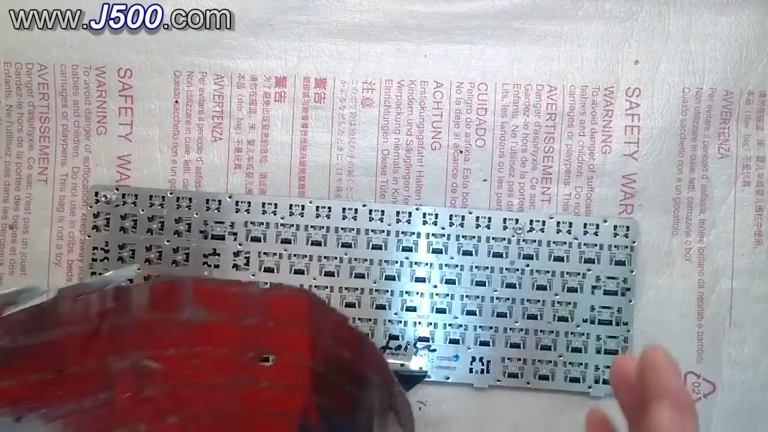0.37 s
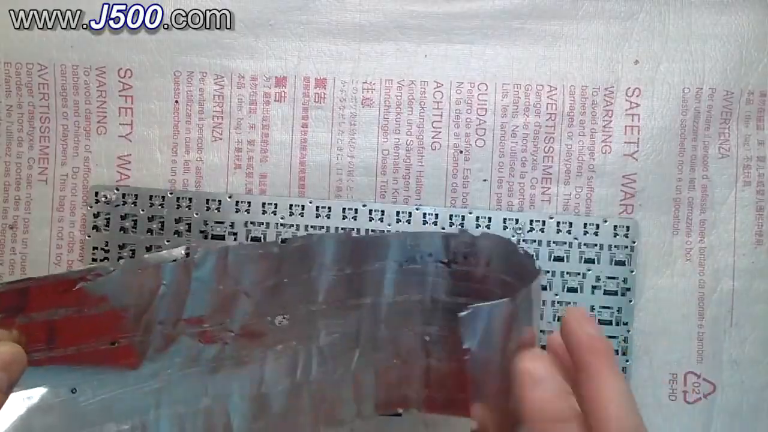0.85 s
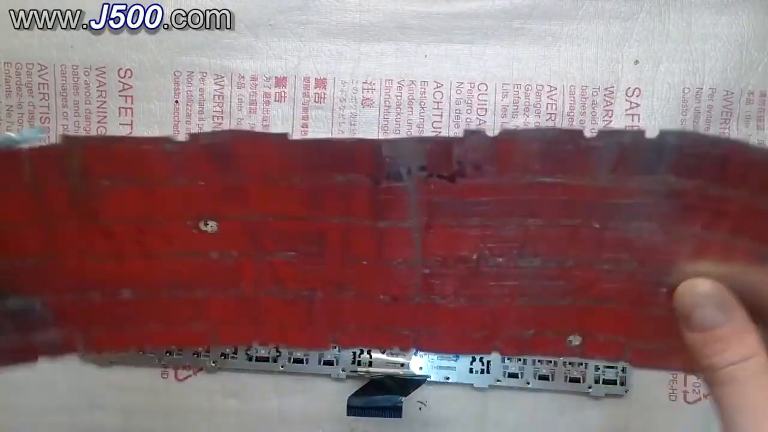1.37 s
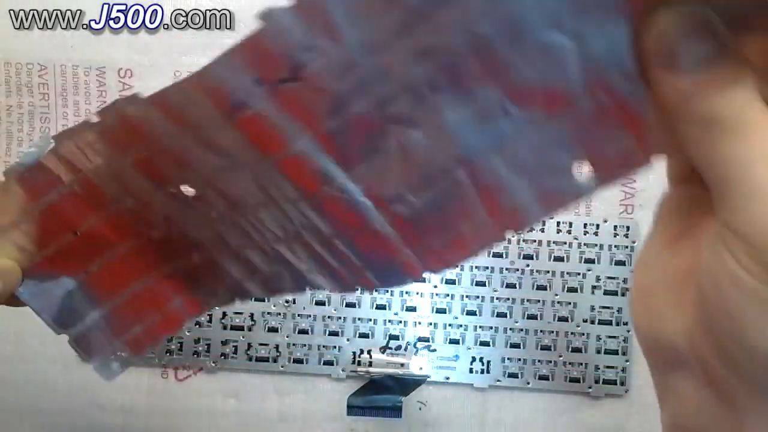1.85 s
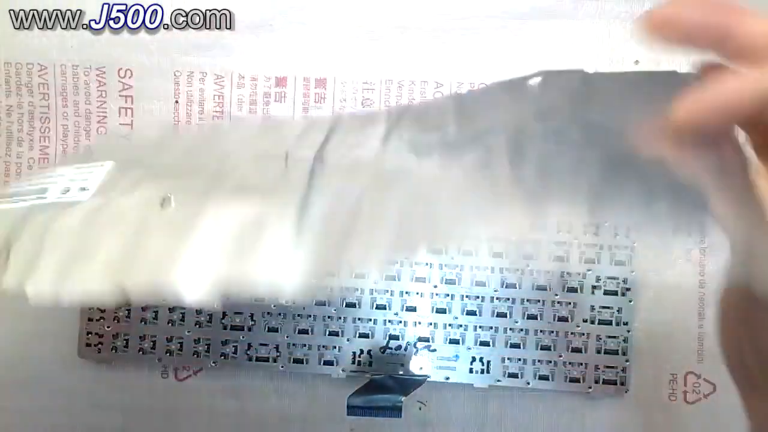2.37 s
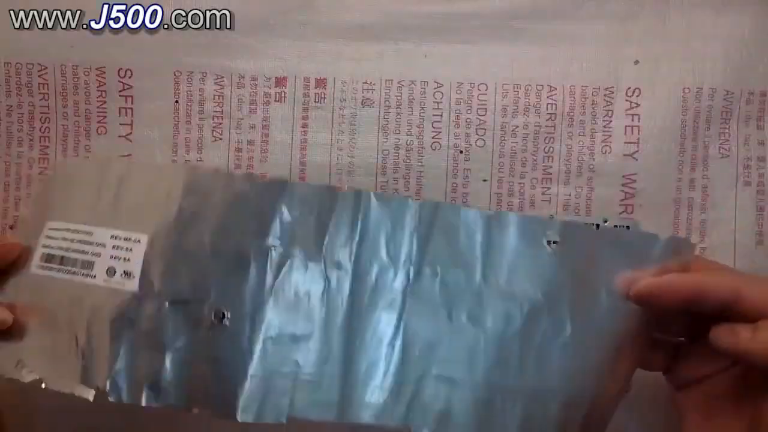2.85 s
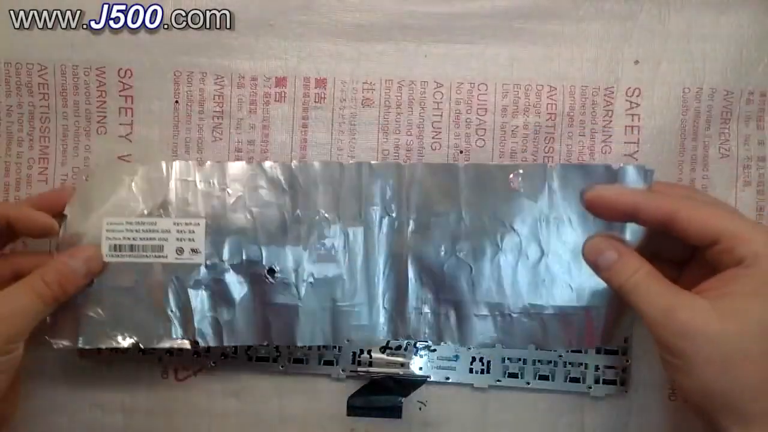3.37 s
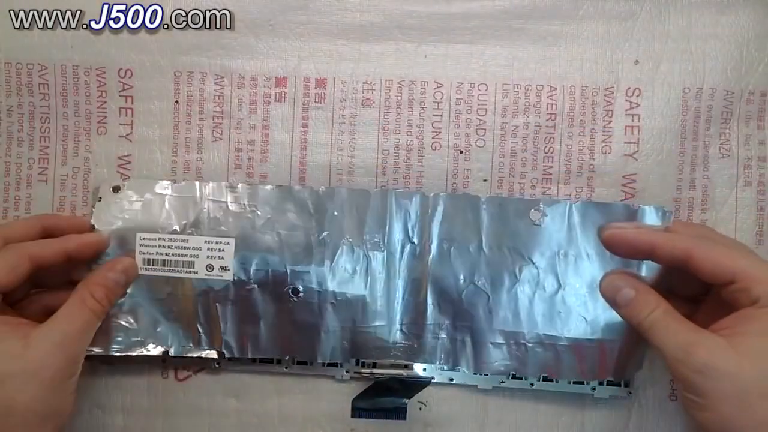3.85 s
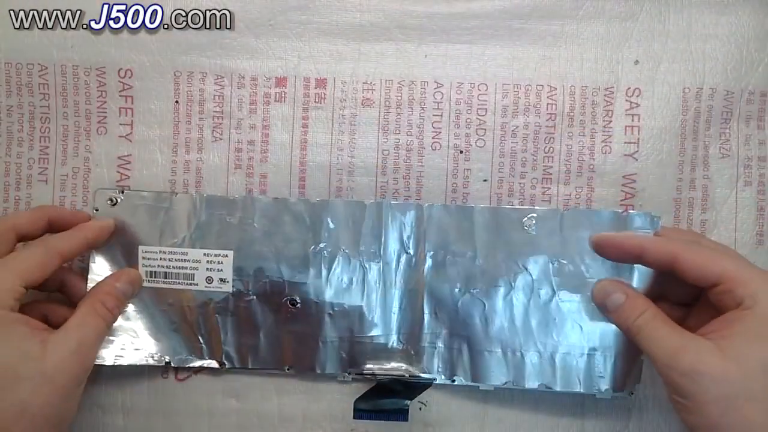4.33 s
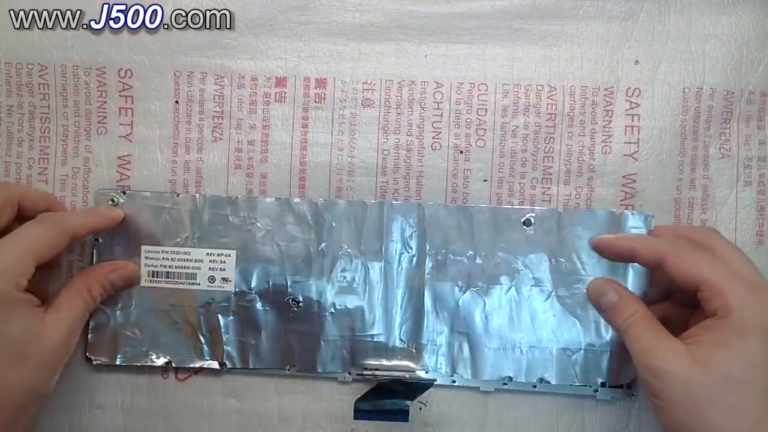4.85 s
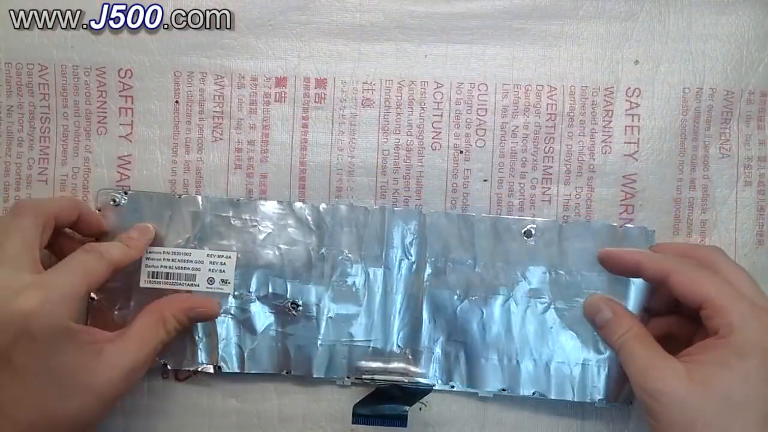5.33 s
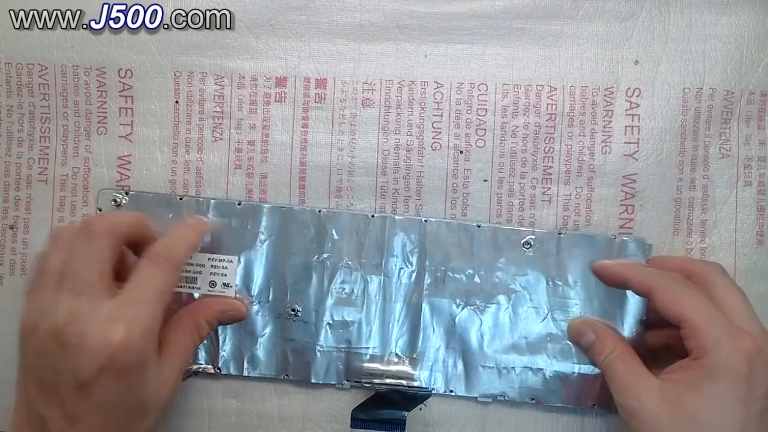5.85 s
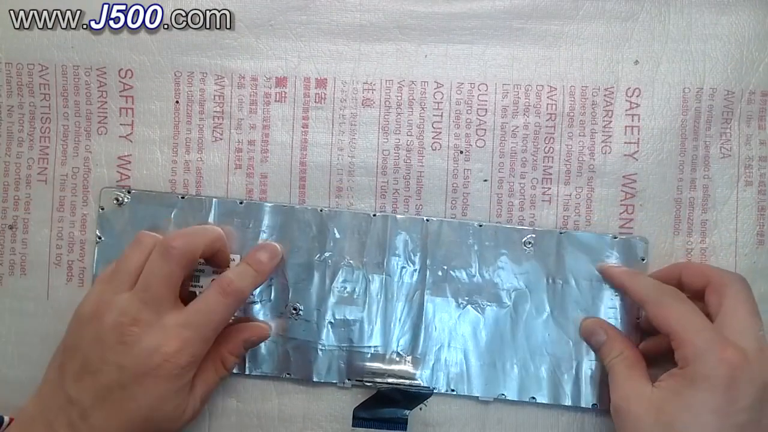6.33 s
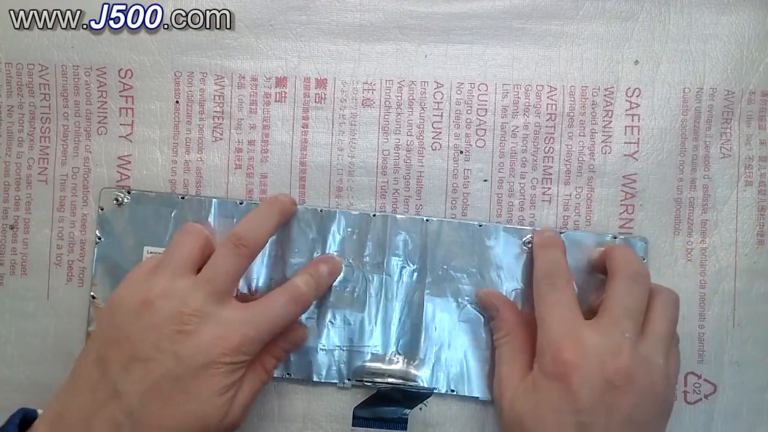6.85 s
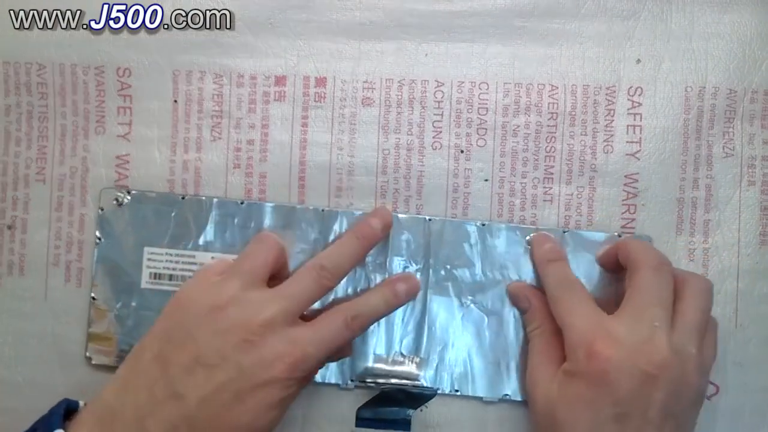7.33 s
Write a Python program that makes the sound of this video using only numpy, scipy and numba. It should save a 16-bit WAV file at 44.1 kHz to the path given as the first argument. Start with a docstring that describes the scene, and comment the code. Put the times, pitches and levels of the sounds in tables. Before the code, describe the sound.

Close, harsh sound of foil backing being turned over and set on a bare keyboard plate. Sheet-metal pops ring briefly over a dull rustle and thin bright hiss. The pops fade, return in a thick crackling flurry, become lighter, then crowd together, shorter and drier, with soft low bumps from leaning hands. The loudest snaps distort; the small room is otherwise quiet.

```python
"""Sharp metallic snaps over a dull rustle, with short low overload thumps under the loudest snaps, in a quiet room.
A thin metal foil backing is turned over in the hands, laid on a bare keyboard plate and pressed down.
Buckling creases ring a crowd of decaying sheet modes; the rustle is filtered noise lifted by small ticks.
Presses swell a low noise. The loudest snaps overload a close, bright microphone: they clip,
and decaying low sines make the thumps."""
import sys
import numpy as np
from scipy import signal
from scipy.fft import rfft, irfft
from scipy.io import wavfile
from numba import njit

SR = 44100
rng = np.random.default_rng(int(sys.argv[2]) if len(sys.argv) > 2 else 0)


def log_audio(samples):
    """Write samples as a 16-bit WAV file to the path given in sys.argv[1]."""
    # one column per channel
    frames = np.atleast_2d(samples).T
    # limit to full scale, then quantise
    limited = np.clip(frames, -1, 1)
    pcm = np.round(limited * 32767).astype(np.int16)
    wavfile.write(sys.argv[1], SR, pcm)


def elevation(decibels):
    """Turn decibel levels (scalar or array-like) into linear amplitude ratios."""
    levels = np.asarray(decibels, float)
    return 10 ** (levels / 20)


N = 328986

# Creases buckling. Each row: start in seconds, relative level in dB at 3.5 kHz, extra in dB at 900 Hz,
# extra in dB at 12 kHz, pitch in Hz of the panel that pops.
SNAPS = [(.0004, -14, -1, -22.5, 3360), (0.077, -16, -18, -6, 1190), (.0925, -11, -6, 4, 3450),
         (0.1027, 3, -17, -5.5, 4080), (0.3043, -8.5, -17, -32, 1940), (.326, -1, -13, -21, 2710),
         (0.4734, -1, -15, -11.5, 3680), (0.645, -2.5, -13.5, -23.5, 3740), (0.708, -40.5, -20, 19, 6070),
         (0.7185, -10.5, -10.5, -42, 1920), (0.7832, -21.5, -6, -43, 1870), (0.8876, -38, 16.5, -8, 1100),
         (0.9146, -19, -5, -15, 1328), (0.9367, 1.5, -12.5, -8.5, 2870), (0.9699, -0.5, -10, -22, 1110),
         (1.0254, -7, -14.5, -43, 1300), (1.06, -36, 8, -20, 1500), (1.074, -42, -9.5, 5.5, 6000),
         (1.1182, -42.5, 13.5, -16, 1040), (1.139, -33, -21, 2.5, 1350), (1.1851, 5.5, -23, -7.5, 2980),
         (1.3244, -25, -14, -9.5, 5700), (1.343, -8, -11.5, -33, 1990), (1.3902, -7, -10, -28, 1910),
         (1.487, -9.5, -34, -12, 3180), (1.504, 1, -24.5, -14.5, 2700), (1.6056, 5.5, -37.5, -6, 5200),
         (1.7457, -46, 15.5, -41.5, 1610), (1.783, -33.5, 0, -56, 872), (1.9613, -31, -13, 3.5, 6360),
         (1.9781, -13, -15.5, -38, 1690), (2.1794, -62.5, 21, -14, 2254), (2.366, -48.5, -5, -2, 1860),
         (2.4598, -24.5, -15, -14.5, 2060), (2.5238, -34.5, -1.5, 2, 1800), (2.6232, -23.5, -61, 4, 5400),
         (2.7325, -39, 15, -1, 460), (2.75, -63, 12, 1.5, 350), (2.828, -39, 10, -14, 1620),
         (2.86, -47, 22.5, 3.5, 1500), (2.897, -27, -1, 10, 4650), (2.9175, -12, -16, -4, 1626),
         (2.9302, -2, -27, -19, 6600), (2.9438, -4.5, -14.5, 1.5, 4970), (3.0018, -26.5, -33, 2, 5590),
         (3.022, -20.5, -35, 8, 5480), (3.0306, -18, -10, 11.5, 3750), (3.0494, -15, -19, 5.5, 1590),
         (3.0928, -3, -18.5, -21.5, 1760), (3.1279, -9.5, -21, -20, 4280), (3.232, -62.5, 26.5, 3, 1030),
         (3.26, -29, -16, -3, 3370), (3.3155, -9.5, -19.5, -17.5, 3800), (3.359, -5.5, -35, -8, 4100),
         (3.3973, -9, -28, -15.5, 2700), (3.5557, -6, -5.5, 1.5, 3500), (3.5691, -13.5, -26, -25, 1330),
         (3.6365, -27, -0.5, -13, 4650), (3.66, -28.5, .5, -19, 1720), (3.685, -26.5, -6, -3.5, 4630),
         (3.7337, -26, -10, -6, 3450), (3.8252, -34, -13.5, -10, 1880), (3.8668, -10, -15.5, -23, 3080),
         (3.9776, -22, -11, -5, 3620), (3.996, -23, -5, -49, 1420), (4.0165, -25.5, -26.5, 2, 1540),
         (4.065, -33, -17, 3, 3920), (4.0857, -10, -14, -6.5, 1670), (4.0968, -8.5, -7.5, -7, 3400),
         (4.1867, -18, -13, -10.5, 2180), (4.2481, -6, -12.5, -0.5, 2900), (4.4105, -39.5, -18.5, -5, 4150),
         (4.4338, -39.5, -4, -17, 1230), (4.5281, -29, -5, -12, 2190), (4.583, -23.5, -12, -12, 2360),
         (4.6213, -15.5, -18, -11, 2060), (4.6534, -20.5, -12.5, -22.5, 2160),
         (4.6816, -6.5, -18, -23.5, 2430), (4.7169, -21.5, -41, -3.5, 3730),
         (4.882, -33, -11.5, -28.5, 2230), (4.8914, -31, -1, -20, 1800), (4.9251, -20.5, -6, -45.5, 2620),
         (5.006, -12, -10, -32.5, 1810), (5.1854, -35.5, -33, -11, 2660), (5.214, -13, -25, -27.5, 2640),
         (5.2199, -6.5, -19.5, -17.5, 1870), (5.2925, -37.5, -10, -9, 3130),
         (5.4785, -48, 5.5, -12.5, 1120), (5.5294, -37, -23, -18.5, 2900), (5.6365, -27.5, -22, -6, 2670),
         (5.6963, -5.5, -16.5, -5.5, 3960), (5.7322, -4, -19.5, -24, 1560), (5.7446, 1.5, -31, -24, 2670),
         (5.7515, 0, -10.5, 3.5, 4940), (5.857, -9, -12, -27.5, 1300), (5.93, -31, -0.5, -3, 990),
         (6.0469, -7.5, -17, -65, 2430), (6.0686, -10, -14, -14.5, 2600), (6.133, -11, -15.5, -20, 2520),
         (6.1555, -17, -4.5, -7, 2540), (6.1774, -14, -13, -28, 1860), (6.195, -22.5, -5, -15, 2000),
         (6.2157, -7.5, -3.5, 0, 3040), (6.2198, 3, -13, -8, 4000), (6.2262, 9, -23, -0.5, 2566),
         (6.2658, -3, -14, -6, 4270), (6.2953, -10, -17.5, 3, 2820), (6.308, -28, -37, 16, 2710),
         (6.3665, -18.5, -18, -21, 1770), (6.4126, 1.5, -18.5, 2, 3700), (6.5, -2, -17, 3, 3160),
         (6.5056, -8.5, -17, 2, 2960), (6.5902, -14.5, -9.5, 5.5, 3560), (6.7141, -23, -8, -33, 2380),
         (6.7433, -20, -12, -12, 1800), (6.764, -17, -16, -15.5, 2760), (6.8004, -20.5, -10, -45, 2230),
         (6.8308, -24, -6, -6, 4340), (6.84, -18, -26, -13, 2440), (6.857, -11.5, -11, -20, 2450),
         (6.864, -15.5, -15, 5.5, 3400), (6.8979, -13.5, -11, 5, 3130), (6.907, -17.5, -7, 11.5, 1960),
         (7.02, -9, -12, -38, 1980), (7.05, -5, -39, -25, 1810), (7.0579, -4, -9.5, -15.5, 2460),
         (7.0886, -7.5, -20, -17, 2970), (7.1741, 2.5, -13, -5, 2880), (7.219, -14.5, -7.5, -10, 1920),
         (7.261, -6.5, -12, -1.5, 2970), (7.2997, -11, -26, 2.5, 4400), (7.4011, 0.5, -30, -11, 2880),
         (7.4514, -15, -9.5, -26, 1230)]
# The sheet rings free in the hands, less once laid down. Each row: time in seconds, gain in dB.
FREE_RINGING = [(0, 9.5), (.9, 8.5), (1.8, 6), (2.4, 3), (3.3, 14.5), (3.8, -10.5), (5.5, -6), (7.46, -8)]


def rms_one(x):
    """Scale to rms 1."""
    return x / np.sqrt(np.mean(x ** 2) + 1e-20)


def in_time(rows):
    """Curve columns, sample by sample."""
    s, *columns = np.transpose(rows)
    return [np.interp(np.arange(N) / SR, s, c) for c in columns]


def at_hz(points, hz):
    """Read a table on a log-frequency axis."""
    point_hz, value = np.transpose(points)
    return np.interp(np.log(hz), np.log(point_hz), value)


def coloured(x, spectrum):
    """Shape by a spectrum; rms 1."""
    hz = np.arange(N // 2 + 1) * SR / N + 1   # +1 keeps the log finite
    return rms_one(irfft(rfft(x) * elevation(at_hz(spectrum, hz)), N))


def drift(knots_per_s):
    """Random line through knots of spread 1."""
    knots = rng.standard_normal(400)
    return np.interp(np.arange(N) / SR * knots_per_s, np.arange(400), knots)


def power_sum_db(a_db, b_db):
    """Level of two unrelated sounds together."""
    return 10 * np.log10(elevation(2 * a_db) + elevation(2 * b_db))


@njit
def add(out, start, turn, shrink, height, steps):
    """Add freely dying sines, each a two-pole recursion."""
    for k in range(len(start)):
        a, b = 2 * shrink[k] * np.cos(turn[k]), shrink[k] ** 2
        old, now = 0.0, height[k] * np.sin(turn[k])
        for i in range(start[k], min(start[k] + steps[k], len(out))):
            out[i] += now
            old, now = now, a * now - b * old


def still_air():
    """Steady noise of the quiet room."""
    # Each row: frequency in Hz, relative level in dB.
    air_colour = [(88, -40.5), (150, 3.5), (406, -6.5), (484, -10), (716, -14), (2020, -35.5), (7180, -33),
                  (16000, 0)]
    return elevation(-57.5) * coloured(rng.standard_normal(N), air_colour)


def room(x):
    """Diffuse tail: noise dying band by band."""
    # Each row: frequency in Hz, t60 in seconds.
    room_t60 = [(300, 0.33), (1000, 0.13), (3000, 0.46), (8000, 0.11), (16000, 0.69)]
    rise_s = 0.0069
    t = np.arange(SR // 2) / SR
    tail = np.zeros(len(t))
    for low_hz in 200 * 2. ** np.arange(6.3):
        band = signal.butter(2, [low_hz, min(2 * low_hz, 19000)], "band", fs=SR, output="sos")
        t60_s = at_hz(room_t60, np.sqrt(2) * low_hz)
        dying = elevation(-60 * t / t60_s) * (1 - np.exp(-t / rise_s))
        tail += signal.sosfilt(band, rng.standard_normal(len(t))) * dying
    return signal.fftconvolve(x, tail / np.sqrt(np.sum(tail ** 2)))[:N]


def stand_rumble():
    """Steady low noise through the stand, its level drifting along a curve."""
    # Each row: time in seconds, rms level in dB.
    stand_db = [(0, -64), (1.3, -63.5), (3, -61), (7.46, -56.5)]
    # Each row: frequency in Hz, relative level in dB.
    rumble_colour = [(15, 3.5), (30, 9.5), (60, -6), (100, -2), (140, -28.5), (300, -31)]
    return elevation(in_time(stand_db)[0]) * coloured(rng.standard_normal(N), rumble_colour)


def leaning():
    """Hands lean on the desk: each rumble swells fast and lets go more slowly."""
    # Each row: time of the peak in seconds, rms level in dB there.
    leans = [(.06, -37.5), (.98, -56), (1.62, -46), (3.61, -54.5), (4.26, -57), (5.75, -38.5), (5.9, -61),
             (6.14, -45.5), (6.23, -41), (6.38, -48), (6.52, -48.5), (6.878, -38.5), (7.08, -44.5),
             (7.2, -45), (7.35, -50)]
    # Each row: frequency in Hz, relative level in dB.
    lean_colour = [(15, -11.5), (30, -1.5), (60, 0), (100, 2.5), (150, -9), (220, -25), (300, -37)]
    rise_db_per_s, fall_db_per_s = 497, 246.5
    t = np.arange(0, N, 64) / SR
    s, peak_db = np.transpose(leans)[:, :, None]
    swell_db = peak_db - np.maximum(rise_db_per_s * (s - t), fall_db_per_s * (t - s))
    gain = np.interp(np.arange(N) / SR, t, np.sqrt(np.sum(elevation(2 * swell_db), axis=0)))
    return gain * coloured(rng.standard_normal(N), lean_colour)


def thumps():
    """Short low thumps under the loudest snaps, as the microphone overloads: a few dying sines each."""
    # Each row: start in seconds, relative level in dB.
    overloads = [(.102, -31.5), (0.943, -42), (1.607, -38.5), (2.946, -48), (5.748, -27), (6.223, -27),
                 (6.413, -26.5), (7.18, -33.5)]
    # Each row: frequency in Hz, relative level in dB, t60 in seconds.
    thump_modes = [(93.5, -8.5, 0.11), (183, -11.5, 0.033), (242, 9, 0.019), (426, 2.5, 0.027)]
    s, thump_db = np.transpose(overloads)[:, :, None]
    hz, mode_db, t60_s = np.transpose(thump_modes)[:, None, :] + 0 * s   # every mode for every thump
    height = elevation(thump_db + mode_db - 7.5 + rng.normal(0, 1.0, hz.shape))
    start = ((s + 0 * hz) * SR).astype(np.int64)
    shrink = elevation(-60 / (t60_s * SR))
    steps = (t60_s * SR).astype(np.int64)
    out = np.zeros(N)
    add(out, start.ravel(), (2 * np.pi * hz / SR).ravel(), shrink.ravel(), height.ravel(), steps.ravel())
    return out


def friction(spectrum, level_db, ticks_per_s, tick_s, tick_db):
    """Friction hiss, lifted by tiny creases that tick and die at once."""
    struck = rng.random(N) < ticks_per_s / SR
    ticks = struck * elevation(tick_db + np.minimum(rng.exponential(2.5, N), 14))
    fade = np.exp(-1 / (tick_s * SR))
    swell = 1 + signal.lfilter([1], [1, -fade], ticks + 1e-18)
    hiss = coloured(swell * rng.standard_normal(N), spectrum)
    return elevation(level_db + 0.5 * drift(11)) * hiss


def settling(start_db, t60_s):
    """Level in dB of the dying rustle that each snap leaves behind."""
    power = np.zeros(N)
    power[(np.transpose(SNAPS)[0] * SR).astype(int)] = elevation(2 * start_db)
    return 10 * np.log10(signal.lfilter([1], [1, -elevation(-120 / (t60_s * SR))], power + 1e-18))


def rustle():
    """Foil slides and flexes, and settles after each snap: a dull and a bright friction hiss."""
    # Each row: time in seconds, level in dB of the dull hiss, level in dB of the bright hiss.
    sliding = [(0, -32.5, -59), (.25, -43, -33.5), (.4, -43.5, -66), (.87, -53, -65), (1.15, -92, -86),
               (1.27, -44, -32), (1.33, -52, -36.5), (1.38, -51, -56), (1.7, -60.5, -55.5),
               (2.22, -77.5, -67), (2.34, -79, -59.5), (2.45, -69, -42.5), (2.85, -52, -40.5),
               (2.97, -41, -37), (3.19, -68, -54), (3.26, -49.5, -35.5), (3.52, -85, -74), (3.66, -59, -59),
               (4.34, -69.5, -61), (5.3, -69, -65), (5.55, -84.5, -48.5), (5.85, -72, -45.5),
               (6.05, -93.5, -59), (6.3, -60.5, -47), (6.7, -62, -45.5), (7.46, -83, -43.5)]
    # Each row of both: frequency in Hz, relative level in dB.
    dull_colour = [(200, -11.5), (500, 3.5), (1200, 1.3), (2500, 9), (5000, -9.5), (9000, -30.5)]
    bright_colour = [(1500, -7), (4000, -2.5), (8000, -2.5), (12000, -1.5), (15500, 6)]
    _, mid_db, _, high_db, _ = np.transpose(SNAPS)
    slide_dull_db, slide_bright_db = in_time(sliding)
    settle_dull_db = settling(mid_db - 36, t60_s=0.18) + in_time(FREE_RINGING)[0]
    settle_bright_db = settling(mid_db + high_db - 47.5, t60_s=0.35)
    dull_db = power_sum_db(slide_dull_db, settle_dull_db)
    bright_db = power_sum_db(slide_bright_db, settle_bright_db)
    dull = friction(dull_colour, dull_db, ticks_per_s=150, tick_s=0.021, tick_db=-7.5)
    bright = friction(bright_colour, bright_db, ticks_per_s=150, tick_s=0.0035, tick_db=0.5)
    return dull + bright


def bending(x):
    """Whatever shakes the sheet also feeds its low modes, more while it hangs free."""
    # Bending modes of the whole sheet. Each row: frequency in Hz, least width in Hz, gain in dB.
    bending_modes = [(363, 14, -12), (429, 38, -0.5), (577.5, 35, -10), (715, 39, 1), (825, 32, -2),
                     (974, 32, 1), (1249, 34, -7), (1390, 9, -4), (1500, 8, -25.5), (1760, 37, -9.5),
                     (2307, 54, -10.5), (2670, 27, -2.5), (2953, 45, -9), (3700, 70, -5)]
    drive = elevation(in_time(FREE_RINGING)[0]) * x
    out = np.zeros(N)
    for k, (hz, width_hz, gain_db) in enumerate(bending_modes):
        r = np.exp(-np.pi * max(width_hz, hz / 60) / SR)   # never narrower than a sixtieth of its pitch
        b = (1 - r * r) / 2 * np.array([1, 0, -1])
        a = [1, -2 * r * np.cos(2 * np.pi * hz / SR), r * r]
        out += (-1) ** k * elevation(gain_db) * signal.lfilter(b, a, drive)
    return out


def snaps(count=440):
    """Each buckle rings a dense crowd of sheet modes; the sheet has bent since the last, so the crowd is new."""
    # The grip damps the sheet: long ring in the air, short once pressed down.
    # Each row: time in seconds, base t60 in seconds.
    grip_t60 = [(0, 0.24), (.7, 0.21), (1.15, 0.15), (1.38, 0.19), (1.6, .12), (2.9, 0.17), (3.4, 0.13),
                (4.3, 0.15), (5.1, .11), (5.75, 0.12), (6.2, 0.086), (7.46, 0.089)]
    # Treble damping of the sheet. Each row: frequency in Hz, factor on the base t60.
    damping = [(3500, 1.297), (8000, 0.9), (15500, 0.53)]
    # Radiation of the sheet and colour of the microphone. Each row: frequency in Hz, gain in dB.
    radiation = [(150, -18.5), (400, -9), (800, -2.5), (1500, 2.5), (3000, -5.5), (6500, -4), (11000, -1.5),
                 (15500, 6)]
    buckling_s = 0.0044   # time the fold takes to run through
    crack_db, crack_ring = 5, 0.3
    panel_db, panel_octaves, panel_ring = 9, 0.16, 0.8   # the popping panel stands out and dies sooner
    low_ring = 1.456   # factor on t60 near 900 Hz
    wide_fold_ring = 0.0059   # a wide fold is dull and rings longer: share of t60 per dB of lost treble

    s, mid_db, low_db, high_db, panel_hz = np.transpose(SNAPS)[:, :, None]
    luck = rng.random((len(SNAPS), 4, count))
    place = (np.arange(count) + luck[:, 0]) / count
    hz = 200 + 15750 * place ** 1.3
    tilt = np.log2(hz / 3500)
    lowness = np.clip(-tilt / 2, 0, 1.3)
    on_panel = np.exp(-(np.log2(hz / panel_hz) / panel_octaves) ** 2)
    crack = np.arange(count) % 3 == 0   # modes near the fold start loud and die first

    colour_db = lowness * low_db + np.clip(tilt / 2.14, 0, 1.1) * high_db + panel_db * on_panel
    spacing_db = 3 * np.log10(place + .01)
    # some modes catch the snap, others sit on a node
    chance_db = (3.3 + 0.63 * lowness) * np.log(-np.log(luck[:, 1] + 1e-9) + 0.00092)
    height_db = mid_db + colour_db + at_hz(radiation, hz) + spacing_db + chance_db + crack_db * crack
    sign = np.sign(luck[:, 2] * 8 % 1 - .5)
    height = sign * elevation(height_db) / np.sqrt(count)

    base_s = np.interp(s, *np.transpose(grip_t60)) * (1 + wide_fold_ring * np.clip(-high_db, 0, 30))
    t60_s = np.clip(base_s, .02, .5) * low_ring ** lowness * at_hz(damping, hz)
    t60_s *= elevation(1.76 * (2 * luck[:, 2] - 3))
    t60_s *= np.where(crack, crack_ring, panel_ring ** on_panel)

    # most of the fold goes at once, the rest trails
    start = ((s + buckling_s * luck[:, 3] ** 2 * np.where(crack, .4, 1)) * SR).astype(np.int64)
    shrink = elevation(-60 / (t60_s * SR))
    steps = (.8 * t60_s * SR).astype(np.int64)
    out = np.zeros(N)
    add(out, start.ravel(), (2 * np.pi * hz / SR).ravel(), shrink.ravel(), height.ravel(), steps.ravel())
    # high-pass: keeps the abrupt mode starts from splashing into the bass
    high_pass = signal.butter(3, 460, "high", fs=SR, output="sos")
    return signal.sosfilt(high_pass, out)


def scene():
    """Foil in the room, over low rumble, overload thumps and still air."""
    foil = snaps()
    foil = foil + elevation(-29.5) * room(foil)
    foil += rustle()
    foil += bending(foil)
    rumble = stand_rumble() + leaning()
    return (foil + rumble + thumps() + still_air())[None]


def band_limit(x):
    """A steep low-pass at the top of the band."""
    return signal.sosfilt(signal.butter(12, 16610, fs=SR, output="sos"), x)


def record(dry):
    """The top is cut and the loudest snaps hit full scale."""
    top_cut = signal.cheby2(12, 25, 16200, fs=SR, output="sos")   # low-pass: order, stop dB, stop edge Hz
    mix = np.clip(signal.sosfilt(top_cut, dry), -1, 1)
    return band_limit(mix)


dry = scene()
out = record(dry)
log_audio(out)
```